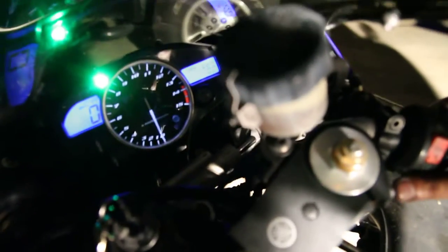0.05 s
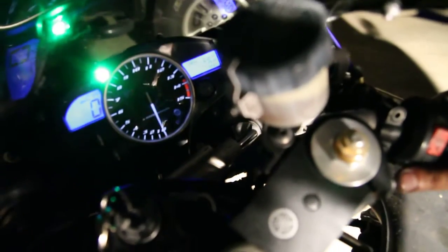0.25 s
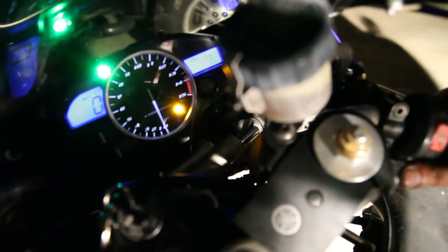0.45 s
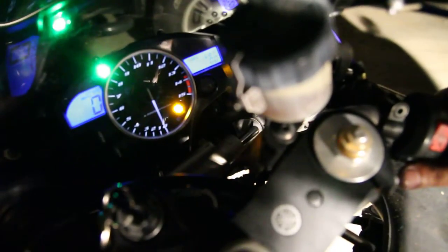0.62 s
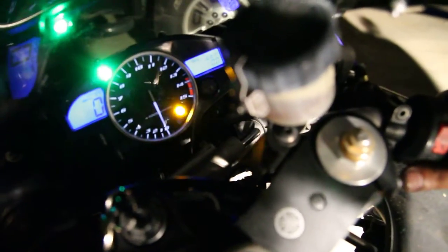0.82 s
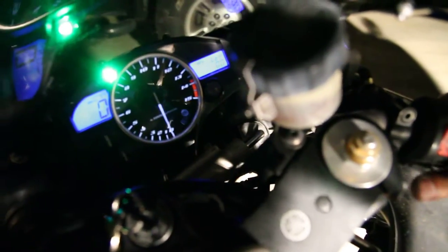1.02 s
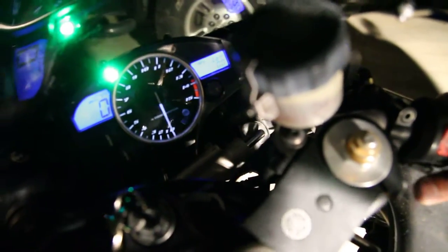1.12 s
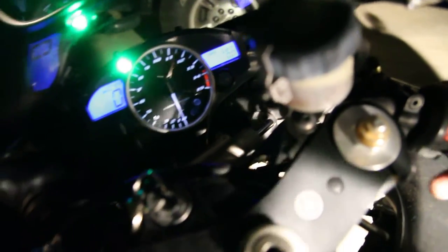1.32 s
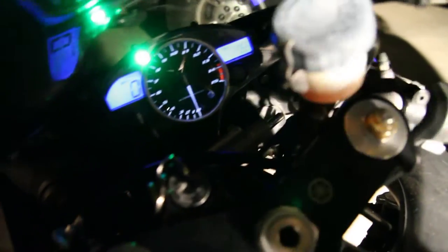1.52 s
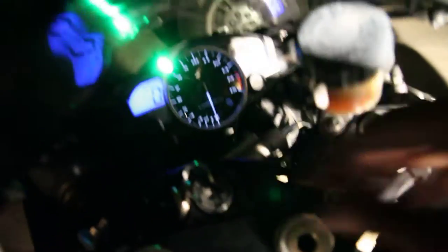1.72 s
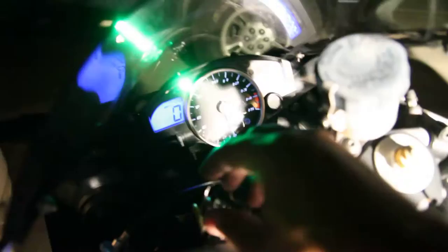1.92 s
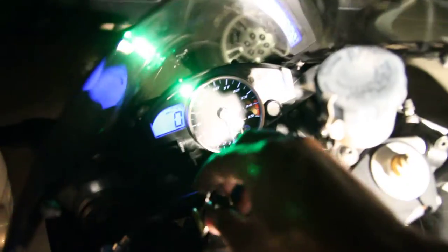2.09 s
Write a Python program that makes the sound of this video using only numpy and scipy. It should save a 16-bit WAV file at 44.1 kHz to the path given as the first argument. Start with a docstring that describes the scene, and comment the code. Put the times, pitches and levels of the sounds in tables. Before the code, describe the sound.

Motorcycle starter motor grinding and whirring briefly, then a sharp switch click over night crickets

```python
"""A high trill, most likely a chorus of crickets, is heard first, over a low distant rumble outdoors at night.
A motorcycle's faulty starter engages with a clack and grinds for half a second: shaft-locked tones whine,
while tooth impacts and scraping noise rattle the engine case; a panel sings briefly as the motor lets go.
The starter button clicks back and light handling ticks follow, all short noise bursts and ringing modes.
The insects are narrow clusters of tones; the rumble and a late faint hiss are coloured noise."""
import sys
import numpy as np
from scipy import signal
from scipy.fft import rfft, irfft, next_fast_len
from scipy.io import wavfile
from scipy.ndimage import map_coordinates

SR = 44100
rng = np.random.default_rng(int(sys.argv[2]) if len(sys.argv) > 2 else 0)


def waveform_to_disk(signal):
    """Save audio, clipped to [-1, 1], as 16-bit WAV at the path in sys.argv[1]."""
    frames = np.transpose(np.atleast_2d(signal))
    scaled = np.clip(frames, -1, 1) * 32767
    samples = np.round(scaled).astype(np.int16)
    wavfile.write(sys.argv[1], SR, samples)


N = 94815


def amp(db):
    """Decibels to gain."""
    return 10 ** (np.asarray(db) / 20)


def unit(x):
    """Scale to rms 1."""
    return x / np.sqrt(np.mean(x ** 2) + 1e-20)


def along(points, hz):
    """(frequency [Hz], value) points read on a log frequency axis."""
    f, v = np.transpose(points)
    return np.interp(np.log(hz + 1), np.log(f + 1), v)


def clock():
    """The time of each sample [s]."""
    return np.arange(N) / SR


def curves(rows):
    """One value per sample for each column after the time."""
    s, *cols = np.transpose(rows)
    return [np.interp(clock(), s, c) for c in cols]


def wobble(rate):
    """An interpolated random curve, rate knots a second."""
    return map_coordinates(rng.standard_normal(2048), [clock() * rate], mode="wrap")


def filtered(x, response):
    """x times a response of frequency."""
    m = next_fast_len(N + SR // 2)
    hz = np.fft.rfftfreq(m, 1 / SR)
    return irfft(rfft(x, m) * response(hz), m)[:N]


def coloured(x, spectrum):
    """x shaped by (frequency [Hz], relative level [dB]) points, at rms 1."""
    return unit(filtered(x, lambda f: amp(along(spectrum, f))))


def noise(spectrum):
    """Coloured noise of rms 1."""
    return coloured(rng.standard_normal(N), spectrum)


def decay(start_s, t60):
    """A fast rise and an exponential fall of 60 dB per t60."""
    age = np.maximum(clock() - start_s, 0)
    return (1 - np.exp(-age / 0.00036)) * amp(-60 * age / t60)


def bursts(events, t60):
    """Sum of decays for (time [s], level [dB]) events."""
    return sum(amp(db) * decay(s, t60) for s, db in events)


def cluster(pitch_hz, width_hz):
    """Noise of the given half width moved up to one pitch, like many overlapping tones, at rms 1."""
    phase = 2 * np.pi * np.cumsum(pitch_hz * np.ones(N)) / SR
    lowpass = lambda f: 1 / np.sqrt(1 + (f / width_hz) ** 3.85)
    a, b = [filtered(rng.standard_normal(N), lowpass) for _ in range(2)]
    return unit(a * np.cos(phase) + b * np.sin(phase))


# how long the surroundings ring: (frequency [Hz], t60 [s])
YARD_DECAY = [(200, 0.18), (1000, 0.49), (3000, 0.34), (7000, 0.25), (14000, 0.19)]


def yard(x):
    """Reflections from the surroundings: a noise tail 5 ms late, its decay time set by frequency."""
    hz, t, z = signal.stft(rng.standard_normal(SR // 2), SR, nperseg=256)
    fading = z * amp(-60 * t / along(YARD_DECAY, hz)[:, None])
    tail = signal.istft(fading, SR, nperseg=256)[1]
    delayed = np.pad(tail, (SR // 200, 0))
    return signal.fftconvolve(x, delayed / np.linalg.norm(tail))[:N]


# starter shaft: (time [s], speed [turns per second])
SHAFT_SPEED = [(.27, 114), (.32, 124), (.365, 129), (.45, 128), (.54, 126), (.61, 120), (.7, 117),
               (.8, 113)]
STARTER_WET_DB = -8


def starter():
    """The drive engages with a clack, bites, whines and grinds, and drops out with a bright rasp."""
    speed, = curves(SHAFT_SPEED)
    turns = np.cumsum(speed) / SR
    rattle = clack() + bite() + grind(turns) + release()
    return rattle + amp(STARTER_WET_DB) * yard(rattle) + whine(turns) + singing()


# the starter engaging: (time [s], level [dB])
CLACK_HITS = [(0.2694, -8.5), (0.2702, -14.5), (0.275, -24)]
# clack spectrum: (frequency [Hz], relative level [dB])
CLACK_SPECTRUM = [(200, -15), (1000, -16), (1900, 6.5), (2800, 3), (4000, 2), (5500, 8), (8000, 0.5),
                  (12000, -9), (16000, -18)]


def clack():
    """The drive striking home: quick successive bursts of coloured noise."""
    return noise(CLACK_SPECTRUM) * bursts(CLACK_HITS, t60=0.021)


# bite spectrum: (frequency [Hz], relative level [dB])
BITE_SPECTRUM = [(700, -43), (1100, -11), (1300, 4), (1600, 1), (2200, -10), (3000, -18), (5000, -5),
                 (8000, -16.5), (14000, -37)]
BITE_S, BITE_LENGTH_S, BITE_DB = .2935, 0.0074, -16.5  # centre, reach either side, level


def bite():
    """The gears bite as the motor takes up the load: one flat-topped burst of noise."""
    shape = np.exp(-((clock() - BITE_S) / BITE_LENGTH_S) ** 4 / 2)
    return noise(BITE_SPECTRUM) * amp(BITE_DB) * shape


START_S, STOP_S, RELEASE_S = .272, 0.7886, 0.028  # run start and end, time constant of the fade


def running():
    """Motor drive: on at once, then an exponential fade after it stops."""
    t = clock()
    return (t > START_S) * np.exp(-np.maximum(t - STOP_S, 0) / RELEASE_S)


TEETH, JITTER_S = 14, .00012  # impacts a turn, random timing spread
TOOTH_SCATTER_DB, ONCE_A_TURN_DB, SCRAPE_DB = 5, -0.5, -5
SPREAD_S = 0.00057  # decay constant of the random paths through the case


def tooth_force(turns):
    """Uneven tooth impacts smeared through the engine case, plus scraping, modulated once a turn."""
    t = clock()
    hits = t[1:][np.diff(np.floor(turns * TEETH)) > 0]
    late, size, push = rng.standard_normal((4096, 3))[:len(hits)].T
    at = np.clip((hits + JITTER_S * late) * SR, 0, N - 1).astype(int)
    strength = np.sign(push) * amp(TOOTH_SCATTER_DB * np.minimum(size, 2))
    impacts = np.bincount(at, strength, N)
    # the paths change only the phases of the impacts
    paths = rng.standard_normal(N) * np.exp(-t / SPREAD_S)
    spread = unit(irfft(rfft(impacts) * np.exp(1j * np.angle(rfft(paths))), N))
    scrape = amp(SCRAPE_DB) * rng.standard_normal(N)
    return (spread + scrape) * amp(ONCE_A_TURN_DB * np.cos(2 * np.pi * turns))


# engine case resonances: (frequency [Hz], width [Hz], relative level [dB])
CASE_RESONANCES = [(760, 14, -11), (1295, 28, -2), (1398, 28, -4), (1600, 30, -8), (1775, 35, -8),
                   (1965, 55, -6), (3070, 70, -1), (3215, 80, 1), (3362, 55, -2), (3545, 45, -4),
                   (3865, 35, -5), (5660, 65, -8), (7340, 55, -12)]


def case_response(f):
    """The engine case as a sum of damped resonances."""
    return sum(amp(db) * 1j * f * w / (c * c - f * f + 1j * f * w) for c, w, db in CASE_RESONANCES)


# grinding force before the layer trims: (time [s], level [dB])
GRIND_FORCE = [(.275, -24), (.283, -22.5), (.291, -17), (.31, -18.5), (.355, -17), (.395, -20.5),
               (.46, -19), (.53, -21), (.55, -18.5), (.58, -18), (.605, -22.5), (.64, -21), (.659, -15.5),
               (.685, -23.5), (.71, -18.5), (.73, -22.5), (.753, -16.5), (.78, -18.5), (.815, -21.5)]
# colour of the grinding relative to the force: (time [s], low body [dB], treble [dB])
GRIND_BALANCE = [(.275, -17, 2.5), (.292, -17, -9), (.36, -12.5, -9), (.46, -12, -9), (.57, -12.5, -8),
                 (.66, -13, -8.5), (.72, -12, -8), (.755, -9.5, -10.5), (.78, -6.5, -12), (.82, -17, -23)]
# teeth that catch and jump: (time [s], boost to the ring and rasp drive [dB])
TOOTH_CATCHES = [(0.3247, 8.5), (.3505, -3), (.5435, 6), (0.5857, 11.5), (0.6198, 10), (0.6495, 12),
                 (0.6582, 9), (0.6634, 0), (0.756, 1), (0.7832, 7)]
# how the case radiates in three layers: (frequency [Hz], relative level [dB])
CASE_LOW_SPECTRUM = [(60, -70), (150, -47), (215, -27), (250, 1), (290, 1.5), (390, 3), (520, -8.5),
                     (650, 2), (850, -5.5), (1100, -11.5), (2000, -63)]
CASE_MID_SPECTRUM = [(600, -61), (900, -10.5), (1130, -10.5), (1260, 1), (1600, -4.5), (2000, -1.5),
                     (2450, -6.5), (2850, -4), (3200, -11), (3700, -3.5), (4400, -3), (5700, -5.5),
                     (7000, -25.5), (10000, -45)]
CASE_TOP_SPECTRUM = [(4000, -40), (6500, -1.5), (7500, 1.5), (10000, -5), (13000, -6), (14500, -28),
                     (16000, -33)]
# the short-lived ring that gives the rasp: (frequency [Hz], relative level [dB])
RASP_SPECTRUM = [(2300, -45), (2800, -7), (3100, 0), (3330, 0), (3620, -6), (4400, -45)]
CATCH_S = 0.0016  # reach of a catch either side of its time
MID_DB, LOW_DB, TREBLE_DB, RING_DB, RASP_DB = -4, -4, -1.5, -10, -9  # layer trims
FLUTTER_DB, FLUTTER_PER_S = 3.5, 170  # greatest swing of the rasp, knots a second


def grind(turns):
    """Tooth force shakes the engine case in three bands; catching teeth drive its ring and rasp."""
    t = clock()
    force = tooth_force(turns)
    mid = amp(curves(GRIND_FORCE)[0]) * running()
    low, top = [mid * amp(db) for db in curves(GRIND_BALANCE)]
    catches = amp(sum(db * np.exp(-((t - s) / CATCH_S) ** 2) for s, db in TOOTH_CATCHES))
    # the ring is brought to the overall rms of the grinding level
    ring = unit(filtered(force * catches * mid, case_response)) * np.sqrt(np.mean(mid ** 2))
    flutter = amp(FLUTTER_DB * np.tanh(wobble(FLUTTER_PER_S)))
    rasp = mid * catches * flutter * coloured(force, RASP_SPECTRUM)
    body = amp(MID_DB) * mid * coloured(force, CASE_MID_SPECTRUM)
    body += amp(LOW_DB) * low * coloured(force, CASE_LOW_SPECTRUM)
    body += amp(TREBLE_DB) * top * coloured(force, CASE_TOP_SPECTRUM)
    return body + amp(RING_DB) * ring + amp(RASP_DB) * rasp


def partials(rows, turns):
    """Sines at multiples of the shaft speed, each wavering in level and phase."""
    total = 0
    for multiple, db in rows:
        phase = 2 * np.pi * round(multiple) * turns + 0.26 * wobble(60.2)
        total = total + amp(db + 1.8 * wobble(21.4)) * np.sin(phase)
    return total


# gear whine: (time [s], hum level [dB], low partials level [dB], tooth-mesh partials level [dB])
WHINE_LEVELS = [(.28, -53, -72, -50), (.33, -40, -35.5, -30), (.42, -38.5, -30.5, -31),
                (.51, -35, -32, -28.5), (.57, -35.5, -38, -19.5), (.62, -38, -56, -37), (.7, -42, -42, -46),
                (.82, -52, -68, -60)]
# low partials: (multiple of shaft speed, relative level [dB])
LOW_PARTIALS = [(3, -16), (5, -3.5), (7, 2), (10, -1), (11, -2)]
# tooth-mesh partials: (multiple of shaft speed, relative level [dB])
MESH_PARTIALS = [(14, 0), (25, -4.5), (28, -12)]


def whine(turns):
    """Partials locked to the shaft: a twice-a-turn hum, and a tooth mesh that peaks as the shaft slows."""
    hum_db, low_db, mesh_db = curves(WHINE_LEVELS)
    hum = amp(hum_db) * partials([(2, 0)], turns)
    low = amp(low_db) * partials(LOW_PARTIALS, turns)
    mesh = amp(mesh_db) * partials(MESH_PARTIALS, turns)
    return (hum + low + mesh) * running()


# the drive disengaging: (time [s], level [dB])
RELEASE_HITS = [(0.7723, -15.5), (0.7804, -23), (0.785, -34)]
# release spectrum: (frequency [Hz], relative level [dB])
RELEASE_SPECTRUM = [(2000, -30), (3200, 8.5), (5000, -12), (8000, 4), (12000, -6), (16000, -7)]


def release():
    """The drive dropping out: decaying bursts of bright noise."""
    return noise(RELEASE_SPECTRUM) * bursts(RELEASE_HITS, t60=0.037)


# a panel sings as the motor lets go: (time [s], level before the wobble [dB])
SINGING_LEVEL = [(.66, -50), (.735, -31.5), (.785, -32.5), (.83, -37), (.92, -41), (1.0, -62.5)]
SINGING_HZ = 938


def singing():
    """One panel mode swells unevenly near the end of the run and outlasts it."""
    s, db = np.transpose(SINGING_LEVEL)
    level_db = np.interp(clock(), s, db, left=-120, right=-120)
    phase = 2 * np.pi * SINGING_HZ * clock() + 0.26 * wobble(30)
    return amp(level_db + 2.06 * wobble(44.7)) * np.sin(phase)


# switch clicks and handling ticks: (time [s], bright crack level [dB], plastic body level [dB])
CONTACTS = [(1.1764, -15, -35), (1.178, -12.5, -28), (1.1828, -27, -36), (1.208, -29, -29),
            (1.2693, -36.5, -56), (1.3095, -39, -56), (1.331, -44, -58), (1.512, -55, -60),
            (2.0952, -35, -34), (2.0965, -43, -46)]
# crack and housing knock spectra: (frequency [Hz], relative level [dB])
CRACK_SPECTRUM = [(500, -36), (1700, -26), (2300, -16), (3500, -11), (6000, -12), (8500, -2), (10500, 0),
                  (12500, 1), (16000, -8)]
KNOCK_SPECTRUM = [(900, -16), (1800, -19), (2250, -13), (2900, -2), (4200, -3), (6500, -1), (9000, -10),
                  (16000, -30)]
# switch modes: (frequency [Hz], relative level [dB], t60 [s])
SWITCH_RESONANCES = [(2266, -23, .08), (8355, -16, .04), (9991, -4, .042), (10570, -4, .015)]
SWITCH_BLUR_HZ = 130  # half width of each mode
CLICK_RING_DB, CLICK_WET_DB = -3, -19


def clicks():
    """Each contact gives a bright crack, knocks the plastic housing and briefly rings the small switch."""
    crack_hits = [(s, db) for s, db, _ in CONTACTS]
    knock_hits = [(s, db) for s, _, db in CONTACTS]
    crack = noise(CRACK_SPECTRUM) * bursts(crack_hits, t60=.015)
    knock = noise(KNOCK_SPECTRUM) * bursts(knock_hits, t60=.022)
    ring = sum(amp(level) * cluster(hz, SWITCH_BLUR_HZ) * bursts(crack_hits, t60)
               for hz, level, t60 in SWITCH_RESONANCES)
    direct = crack + knock + amp(CLICK_RING_DB) * ring
    return direct + amp(CLICK_WET_DB) * yard(direct)


# far insect voices: (pitch [Hz], half width [Hz], level [dB])
CHORUS_VOICES = [(2566, 80, -47.5), (2757, 97, -53.5), (3493, 90, -53), (5340, 334, -44.5),
                 (5920, 380, -49)]
# the nearest trill: (time [s], pitch [Hz], level [dB])
NEAR_TRILL = [(0, 5180, -37.5), (.12, 5230, -33), (.25, 5300, -30.5), (.85, 5220, -36.5), (1.08, 5178, -33),
              (1.3, 5203, -38.5), (1.55, 5248, -35), (1.76, 5237, -31.5), (1.95, 5220, -33.5),
              (2.15, 5260, -35.5)]
# one insect joins in briefly: (time [s], level [dB])
JOINER_LEVEL = [(1.42, -82), (1.52, -46), (1.66, -47.5), (1.79, -49), (1.9, -59), (2.04, -71)]
# its tones: (pitch [Hz], half width [Hz], relative level [dB])
JOINER_VOICES = [(4416, 27, -2.2), (4570, 56, 0.33)]
TRILL_WIDTH_HZ, OVERTONE_DB = 140, -23.5  # half width, overtone relative to the trill


def insects():
    """A far chorus, a nearer trill with its overtone, and one brief extra voice, all tone clusters."""
    chorus = sum(amp(db) * cluster(hz, width) for hz, width, db in CHORUS_VOICES)
    pitch, level_db = curves(NEAR_TRILL)
    overtone = amp(OVERTONE_DB) * cluster(2 * pitch, 2 * TRILL_WIDTH_HZ)
    trill = amp(level_db) * (cluster(pitch, TRILL_WIDTH_HZ) + overtone)
    joiner_tones = sum(amp(db) * cluster(hz, width) for hz, width, db in JOINER_VOICES)
    return chorus + trill + amp(curves(JOINER_LEVEL)[0]) * joiner_tones


# distant rumble and air: (frequency [Hz], relative level [dB])
AIR_SPECTRUM = [(20, -29), (38, -26), (58, 1.5), (80, -11), (110, 3.5), (150, -7.5), (250, -5),
                (380, -12.5), (520, -10), (680, -13.5), (900, -9.5), (1500, -18), (2200, -23.5),
                (4000, -27), (8000, -32.5), (11000, -30.5), (16000, -41)]
# faint hiss as the hand moves: (time [s], level [dB])
HISS_LEVEL = [(1.35, -75), (1.6, -59), (1.8, -56), (2.05, -54.5), (2.15, -48)]
# hiss spectrum: (frequency [Hz], relative level [dB])
HISS_SPECTRUM = [(4000, -11), (7500, 2), (8300, 3), (11500, -3), (16000, -19)]
AIR_DB = -42.5


def background():
    """Distant rumble as steady coloured noise, and a faint hiss that grows towards the end."""
    rumble = amp(AIR_DB) * noise(AIR_SPECTRUM)
    hiss = amp(curves(HISS_LEVEL)[0]) * noise(HISS_SPECTRUM)
    return rumble + hiss


def scene():
    """Starter, clicks, insects and background summed to one channel."""
    return (starter() + clicks() + insects() + background())[None]


CEILING, KNEE, TOP_HZ = .72, 10, 16000  # peak limit, sharpness of the rounding, band limit


def record(dry):
    """Round off the highest peaks, then keep nothing above the band limit."""
    rounded = dry / (1 + np.abs(dry / CEILING) ** KNEE) ** (1 / KNEE)
    return np.array([filtered(channel, lambda f: f < TOP_HZ) for channel in rounded])


dry = scene()
out = record(dry)
waveform_to_disk(out)
```